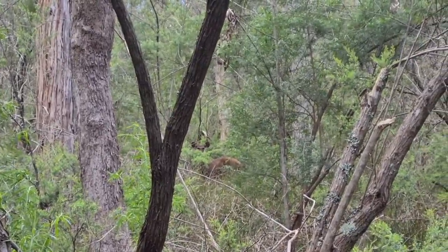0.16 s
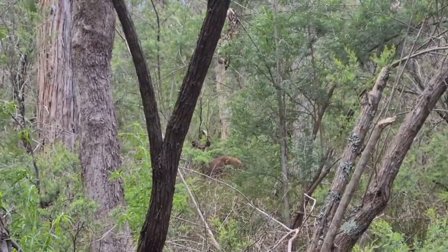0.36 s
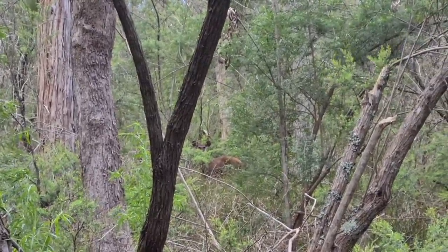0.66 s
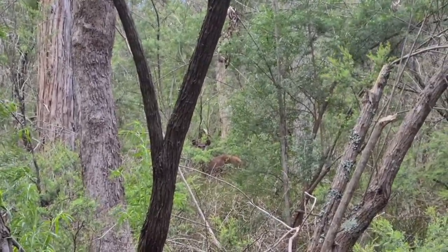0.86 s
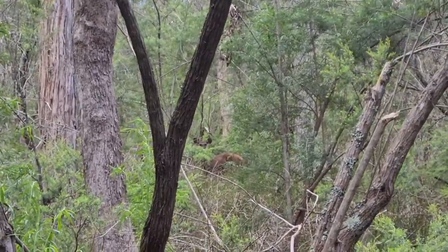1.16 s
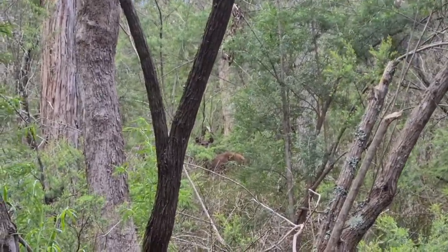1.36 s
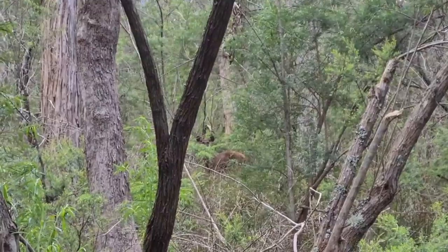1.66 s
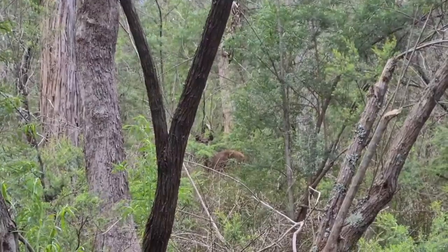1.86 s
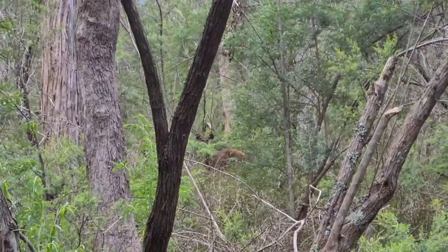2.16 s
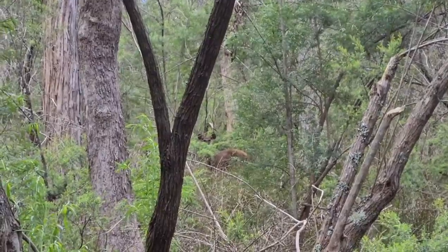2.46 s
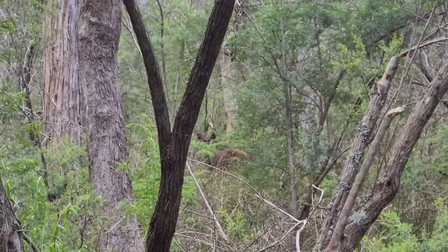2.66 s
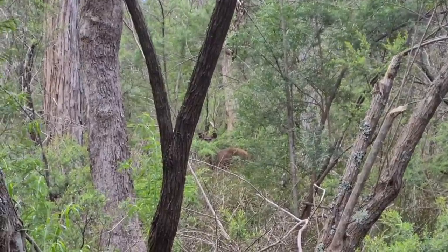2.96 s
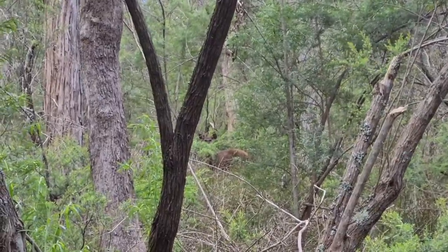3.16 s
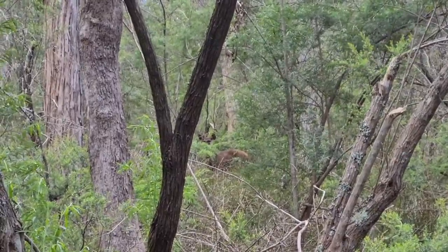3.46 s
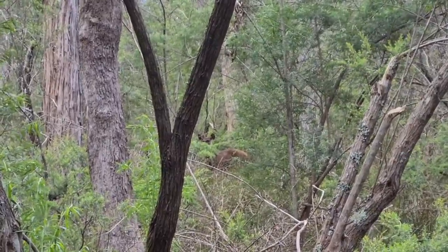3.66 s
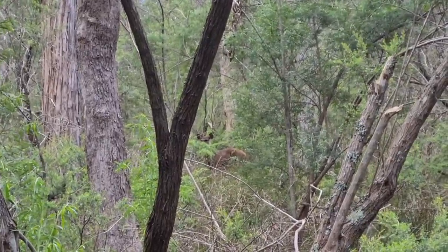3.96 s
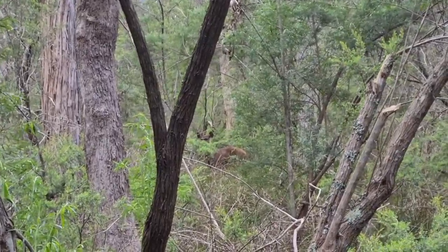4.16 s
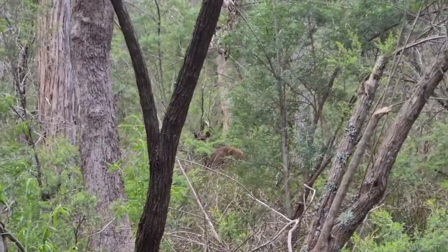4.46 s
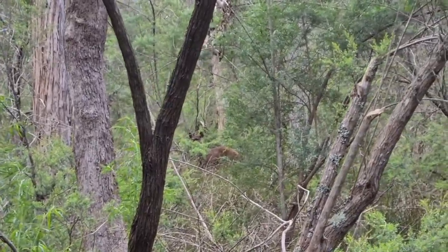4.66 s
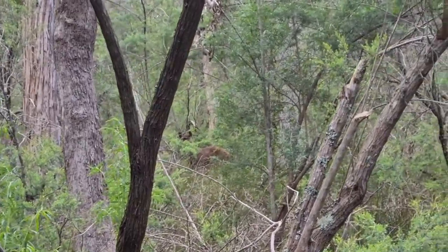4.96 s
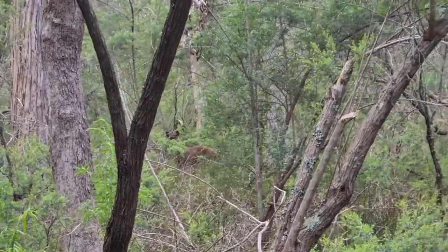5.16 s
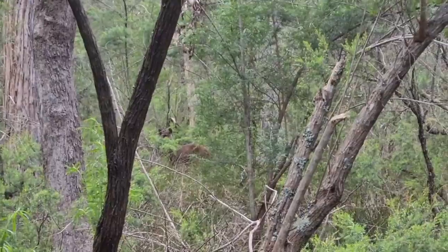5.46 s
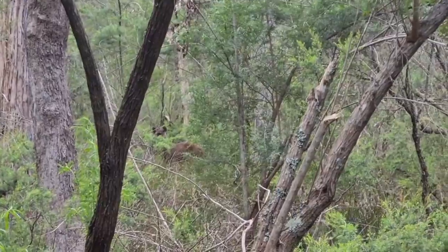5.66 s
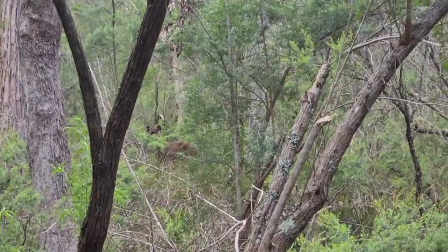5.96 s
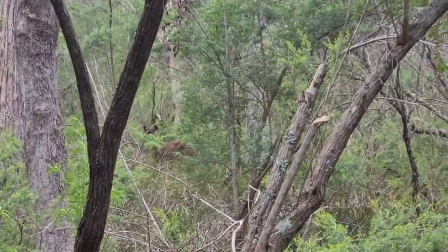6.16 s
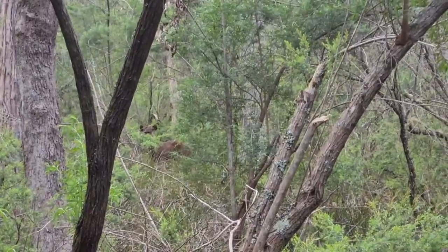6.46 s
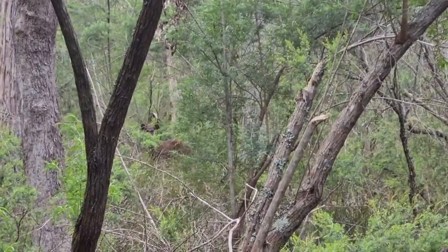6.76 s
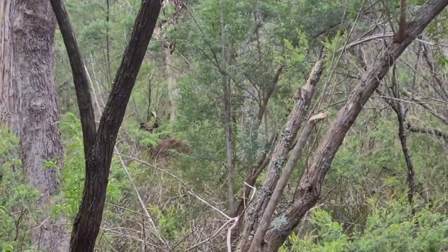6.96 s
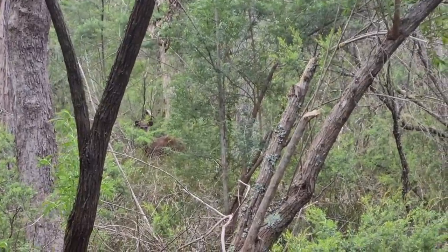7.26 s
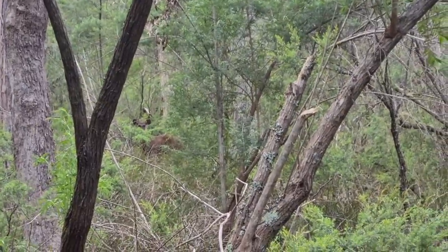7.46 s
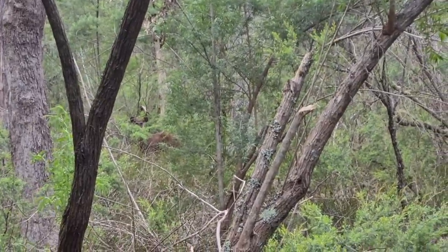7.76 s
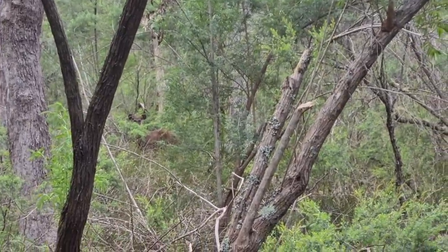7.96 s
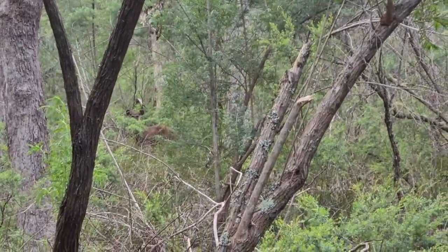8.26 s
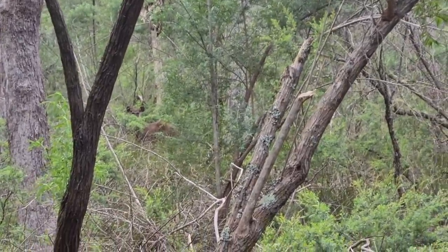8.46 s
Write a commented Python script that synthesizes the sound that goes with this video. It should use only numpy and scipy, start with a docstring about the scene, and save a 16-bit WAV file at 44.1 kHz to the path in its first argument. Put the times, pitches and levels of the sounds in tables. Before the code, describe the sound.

A soft breeze moves through quiet bushland while a distant bird chirps faintly. Close on the right, a mouth-blown reed caller gives one loud, deer-like bleat that rises, then sags into a rasp. A small bird tinkles on the left as the distant one chatters on and off. Two more bleats follow about a second apart, nearly dry, and the background dips after each call.

```python
"""Quiet bushland. Air moves through the trees throughout; a far bird opens with falling flicks.
At 1.1 s, close on the right, a mouth-blown reed caller gives a deer-like bleat: it snaps on, arches, rasps.
The trees answer softly; the camera's gain control ducks the air at each bleat and creeps back.
From 2.5 s the far bird chatters on and off, joined at 2.7-4.6 s by a small bird tinkling on the left.
Two more bleats follow at 6.3 and 7.4 s."""
import sys
import numpy as np
from scipy import signal
from scipy.fft import rfft, irfft, next_fast_len
from scipy.io import wavfile
from scipy.ndimage import uniform_filter1d, minimum_filter1d, map_coordinates

SR = 44100
rng = np.random.default_rng(int(sys.argv[2]) if len(sys.argv) > 2 else 0)


def persist_wave(psi):
    """Save psi, clipped to +-1, as 16-bit WAV."""
    counts = np.round(np.clip(psi, -1, 1) * 32767).astype(np.int16)
    wavfile.write(sys.argv[1], SR, np.atleast_2d(counts).T)


N = 380141

# Table levels are relative.
# rumble spectrum: freq_hz, density_db
RUMBLE_SPECTRUM = [(15, -21), (30, -8), (65, 0.5), (100, -2), (160, -14), (400, -38.5)]
# rumble swell: time_s, level_db
RUMBLE_SWELL = [(0, -67.5), (.9, -61), (1.3, -64.5), (2.6, -64.5), (4.3, -64), (5.3, -66.5), (6.9, -57.5),
                (7.75, -65.5), (8.6, -63.5)]
# canopy wash spectrum: freq_hz, density_db
WASH_SPECTRUM = [(70, -23), (160, -3.5), (280, -2), (550, -2.5), (800, -6.5), (1400, -22.5), (3000, -49.5)]
# leaf rustle spectrum: freq_hz, density_db
LEAF_SPECTRUM = [(400, -19), (850, 0), (1350, 3), (1950, -6), (2900, -4), (4200, -10.5), (6700, -14),
                 (7900, -24), (11500, -26), (15500, -27)]
# gusts in the leaves: centre_s, half_length_s, boost_db
GUSTS = [(0.125, .2, 3), (4.453, .22, 1.5), (5.55, .33, 3)]
# left-right likeness of the breeze: freq_hz, correlation
COHERENCE = [(50, 0.37), (100, 0.67), (190, 0.93), (500, 0.72), (1200, .5), (3000, .15), (8000, 0.046)]

# far bird, runs of flicks: first_s, last_s, spacing_s, top_hz, level_db
FLICK_RUNS = [(0.084, 0.663, .193, 3550, -64), (2.49, 3.227, .147, 4045, -57),
              (4.809, 5.064, .126, 4860, -62), (5.101, 5.698, .15, 3430, -55.5)]
# far bird, slurs onto a held pitch: start_s, length_s, pitch_hz, start_below_ratio, level_db
SLURS = [(5.058, 0.081, 3030, -0.58, -54), (5.25, 0.064, 2950, 0.062, -54.5),
         (5.374, 0.054, 3660, 0.045, -55), (5.662, 0.051, 3700, 0.094, -53.5),
         (5.869, 0.069, 2840, .3, -54.5), (5.919, .11, 3580, 0.082, -57),
         (6.014, 0.059, 2876, 0.086, -53.5)]
# decay of tree scatter: freq_hz, t60_s
TREE_DECAY = [(300, .3), (1200, .4), (3000, 0.51), (6000, 0.42), (12000, 0.17)]

# pitch curve per bleat: time_s, pitch_hz
BLEAT_PITCH = [
    [(1.078, 1312), (1.126, 1400), (1.18, 1581), (1.21, 1651), (1.228, 1665), (1.252, 1656), (1.288, 1545),
     (1.353, 1463), (1.413, 1428), (1.461, 1384), (1.497, 1306), (1.545, 1146), (1.599, 1047), (1.623, 937),
     (1.734, 593)],
    [(6.263, 1368), (6.281, 1416), (6.311, 1445), (6.359, 1605), (6.389, 1667), (6.413, 1656),
     (6.484, 1553), (6.526, 1442), (6.544, 1419), (6.592, 1398), (6.622, 1363), (6.682, 1253),
     (6.706, 1170), (6.754, 907), (6.844, 579)],
    [(7.364, 1590), (7.406, 1605), (7.448, 1679), (7.484, 1725), (7.532, 1722), (7.585, 1709),
     (7.633, 1639), (7.729, 1532), (7.783, 1503), (7.831, 1390), (7.867, 1335), (7.909, 1232),
     (7.969, 1107), (8.082, 784), (8.128, 584)],
]
# level curve per bleat, catch to release: time_s, level_db
BLEAT_LEVEL = [
    [(1.076, -11.5), (1.128, -9.5), (1.16, -13.5), (1.235, -15.5), (1.298, -12.5), (1.335, -15.5),
     (1.43, -12.5), (1.458, -10), (1.51, -14.5), (1.64, -17), (1.698, -26.5), (1.74, -50)],
    [(6.26, -12.5), (6.33, -12.5), (6.36, -13.5), (6.47, -13.5), (6.5, -11), (6.68, -24), (6.75, -21),
     (6.785, -21.5), (6.816, -27), (6.85, -46.5)],
    [(7.36, -17), (7.4, -14), (7.47, -15.5), (7.775, -11.5), (7.86, -20.5), (7.895, -24), (7.915, -20.5),
     (7.94, -24), (7.98, -24), (8.003, -19), (8.095, -28.5), (8.14, -58)],
]
# delivery per bleat: push_db, surge_s, surge_half_s, surge_twang_db, surge_buzz_db,
# hiss_db, lead_in_s, whistle_hz, ring_db
BLEAT_DELIVERY = [(7.5, 1.54, 0.083, 8.5, 13.5, -40.5, 0.086, 1100, -38),
                  (8, 6.405, .03, 3, 2.5, -42.5, 0.067, 1150, -36.5),
                  (9.5, 7.56, .06, 2, 8.5, -44.5, 0.1, 1380, -45.5)]
# resonance of the caller: freq_hz, gain_db
CALLER_RESONANCE = [(550, -22.5), (900, -19.5), (1150, -12), (1700, -9), (2300, -6.5), (2900, 3),
                    (3400, -1.5), (4100, -14.5), (5000, -12), (6100, -19.5), (6900, -17.5), (8200, -37.5),
                    (9900, -31.5), (11700, -24), (13500, -23.5), (15200, -20)]
# air hissing through the reed: freq_hz, density_db
HISS_SPECTRUM = [(100, -48.5), (400, -18.5), (800, -7.5), (1150, -8), (2000, -7), (2900, -1.5), (3500, -1),
                 (4300, -14.5), (5700, -5), (6900, 0), (8300, -17.5), (10500, -19.5), (12000, -6.5),
                 (13000, -7.5), (15300, -1)]
# sizzle riding on the buzz: freq_hz, density_db
SIZZLE_SPECTRUM = [(3500, -29), (5600, -12.5), (6900, -7.5), (8300, -20.5), (10500, -9), (12000, -2),
                   (13000, -6.5), (15200, 0)]
# hollow puff at release: freq_hz, density_db
PUFF_SPECTRUM = [(100, -49), (280, -2.5), (380, 0.5), (600, -10), (1000, -17.5), (2000, -36)]
# trunk and ground reflections: left_delay_ms, right_delay_ms, level_db
BOUNCES = [(1.05, 1.6, -24.5), (3.3, 4.1, -29), (7.6, 8.006, -28.5)]

# near bird, reedy arched notes: start_s, top_hz, level_db
ARCHES = [(2.72, 5860, -55), (3.072, 6110, -46.5), (3.291, 5520, -47), (3.425, 5820, -45.5),
          (3.791, 5950, -46), (4.017, 5650, -49), (4.168, 6020, -48.5), (4.251, 5700, -46.5)]
# near bird, clear dropping notes: start_s, length_s, pitch_hz, level_db
TINKLES = [(2.817, 0.027, 5110, -45), (2.862, 0.047, 5830, -42.5), (3.15, 0.025, 5765, -30.5),
           (3.186, 0.051, 6545, -34.5), (3.349, 0.028, 5220, -36.5), (3.378, .013, 5460, -37.5),
           (3.503, 0.026, 5900, -34.5), (3.62, 0.025, 5534, -34), (3.657, 0.017, 6780, -38),
           (3.71, 0.029, 5144, -37), (3.744, 0.013, 5550, -36.5), (3.87, 0.028, 6074, -33),
           (3.919, 0.047, 6610, -37), (4.078, 0.02, 4984, -31.5), (4.113, 0.022, 6540, -41),
           (4.303, 0.14, 6470, -38.5), (4.462, 0.11, 5064, -31)]

WASH_DB, LEAVES_DB = -56, -55.5  # between gusts
LEFT_LAG_MS = .51  # leaves and near bird
FLICK_S, FLICK_END_RATIO, FLICK_SCATTER_DB = 0.053, .56, 2.5
HELD_TONE_DB = -12.5  # reference for a bleat's level swings
TWANG_DB, TWANG_DB_PER_DB = -24, 0.39  # overtones at about 4-8 kHz
BUZZ_DB, BUZZ_DB_PER_DB = -33.5, .12  # overtones above 8 kHz
DULL_S, DULL_DB, RING_HZ = 0.11, 24.5, 1140  # end of the blow
DROP_RATIO, DROP_BASE_HZ = .35, 4400  # a tinkle drops by this share of its height above the base
ARCH_S, ARCH_START_RATIO, ARCH_END_RATIO = 0.0364, .88, .96
CEILING, HOLD_S, RECOVER_DB_PER_S, TOP_HZ = 0.94, 0.78, 4.5, 15900


def amp(db):
    """Decibels to gain."""
    return 10 ** (np.asarray(db) / 20)


def unit(x):
    """x at rms 1."""
    return x / np.sqrt(np.mean(x ** 2) + 1e-20)


def at_hz(rows, hz):
    """(freq_hz, value) rows read on a log axis."""
    freq_hz, values = np.transpose(rows)
    return np.interp(np.log(hz + 1), np.log(freq_hz + 1), values)


def at_time(rows, t):
    """(time_s, value) rows read at t."""
    return np.interp(t, *np.transpose(rows))


def wobble(rate_hz, size):
    """Smooth random curve with knots at rate_hz."""
    knots = rng.standard_normal(int(size * rate_hz / SR) + 4)
    return map_coordinates(knots, [np.arange(size) * rate_hz / SR])


def filtered(x, response):
    """x through a complex frequency response."""
    n = x.shape[-1]
    m = next_fast_len(n + 8192)
    return irfft(rfft(x, m) * response(np.fft.rfftfreq(m, 1 / SR)), m)[..., :n]


def delayed(x, ms):
    """x, later by ms."""
    return filtered(x, lambda hz: np.exp(-2j * np.pi * hz * ms / 1000))


def add(track, start_s, sound):
    """Mix a sound into a track."""
    part = track[round(start_s * SR):][:len(sound)]
    part += sound[:len(part)]


def placed(x, left_db, left_lead_ms):
    """Direct path to two microphones."""
    return np.array([amp(left_db) * delayed(x, -left_lead_ms), x])


def moving_air(spectrum, patchy_db):
    """Partly coherent stereo noise, rms 1, with patches of random gain."""
    bins = signal.stft(rng.standard_normal((2, N)), nperseg=512)[2]
    patches = uniform_filter1d(rng.standard_normal(bins.shape[1:]), size=6, axis=0)
    patches = unit(uniform_filter1d(patches, size=14, axis=1))
    pair = signal.istft(bins * amp(patchy_db * patches), nperseg=512)[1][:, :N]

    def mid_side(hz):
        width_rad = np.arccos(at_hz(COHERENCE, hz)) / 2
        return amp(at_hz(spectrum, hz)) * [np.cos(width_rad), np.sin(width_rad)]

    mid, side = filtered(pair, mid_side)
    return unit(np.array([mid + side, mid - side]))


def breeze():
    """Low rumble, canopy wash and a leaf rustle that swells in gusts."""
    t = np.arange(N) / SR
    gust_db = sum(db * np.exp(-((t - centre_s) / half_s) ** 2) for centre_s, half_s, db in GUSTS)
    rumble_db = at_time(RUMBLE_SWELL, t) + 4.5 + wobble(6.5, N)
    rumble = amp(rumble_db) * moving_air(RUMBLE_SPECTRUM, patchy_db=0.5) * amp([[1], [-1]])
    wash = amp(WASH_DB + .2 * gust_db) * moving_air(WASH_SPECTRUM, patchy_db=0.45)
    leaves = amp(LEAVES_DB + gust_db) * moving_air(LEAF_SPECTRUM, patchy_db=1.35) * amp([[-1.5], [1.2]])
    return rumble + wash + np.array([delayed(leaves[0], LEFT_LAG_MS), leaves[1]])


def bird_note(length_s, pitch_hz, waver, reed=0):
    """Wavering whistle; pitch_hz is a function of progress u, 0 to 1."""
    n = int(length_s * SR)
    u = np.linspace(0, 1, n)
    hz = pitch_hz(u) * (1 + waver * wobble(700, SR // 4)[:n])
    phase = 2 * np.pi * np.cumsum(hz) / SR
    # reedy note: harmonic 4 of a low voice, flanked by 3 and 5
    flanks = np.sin(phase * 3 / 4) + np.sin(phase * 5 / 4)
    swell = np.sin(np.pi * u ** 1.1) * amp(0.72 * wobble(80, SR // 4)[:n])
    return swell * (np.sin(phase) + reed * flanks)


def far_bird():
    """Runs of falling flicks and a few slurs, on the right, scattered by the trees."""
    song = np.zeros(N)
    for first_s, last_s, spacing_s, top_hz, db in FLICK_RUNS:
        fall_hz = lambda u: top_hz * (1 - (1 - FLICK_END_RATIO) * u ** 1.6)
        for start_s in np.linspace(first_s, last_s, round((last_s - first_s) / spacing_s) + 1):
            flick = bird_note(FLICK_S, fall_hz, waver=.05)
            add(song, start_s, amp(db + FLICK_SCATTER_DB * rng.standard_normal()) * flick)
    for start_s, length_s, hz, below, db in SLURS:
        bend_hz = lambda u: hz * (1 - below * (1 - u) ** 1.8)
        add(song, start_s, amp(db) * bird_note(length_s, bend_hz, waver=0.025, reed=0.092))
    direct = amp(9.5) * placed(song, left_db=-11.5, left_lead_ms=0.075)
    return direct + amp([[-2], [2]]) * tree_scatter(song)


def tree_scatter(x):
    """Diffuse tail from trunks and leaves, independent at each microphone."""
    hz, t, bins = signal.stft(rng.standard_normal((2, SR * 3 // 4)), SR, nperseg=256)
    decay = amp(-60 * t / at_hz(TREE_DECAY, hz)[:, None])
    build_up = 1 - np.exp(-t / 0.025)
    tail = signal.istft(bins * decay * build_up, SR, nperseg=256)[1]
    return signal.fftconvolve(x[None], tail / np.linalg.norm(tail[0]), axes=1)[:, :N]


def reed_voice(pitch_hz, phase, slack, body_db, twang_db, buzz_db):
    """Reed harmonics shaped by the caller's resonance, in three bands with separate levels."""
    k = np.arange(1, 25)[:, None]
    hz = k * pitch_hz
    shimmer_db = np.array([wobble(28, len(phase)) for _ in k]) * (np.minimum(0.5 * k, 4) + 0.4 * slack)
    emphasis_db = (k == 2) * 7 + (k == 4) * 4 * slack
    in_band = np.clip((TOP_HZ - hz) / 500, 0, 1)
    gain = amp(at_hz(CALLER_RESONANCE, hz) + emphasis_db + shimmer_db) * in_band
    partials = gain * np.sin(k * phase)
    body = np.clip((4200 - hz) / 600, 0, 1)
    buzz = np.clip((hz - 8000) / 1000, 0, 1)
    voice = np.zeros(len(phase))
    for band, db in [(body, body_db), (1 - body - buzz, twang_db), (buzz, buzz_db)]:
        band_rms = np.sqrt(np.sum((band * gain) ** 2, 0) / 2 + 1e-12)
        voice += amp(db) * np.sum(band * partials, 0) / band_rms
    return voice


def breath(spectrum, n):
    """Airflow noise, rms 1."""
    return unit(filtered(rng.standard_normal(n), lambda hz: amp(at_hz(spectrum, hz))))


def bleat(pitch_rows, level_rows, surge_s, surge_half_s, surge_twang_db, surge_buzz_db,
          hiss_db, lead_in_s, whistle_hz, ring_db):
    """One blow as (start_s, sound): a clean reed tone that turns raspy as its pitch sags."""
    on_s, off_s = level_rows[0][0], level_rows[-1][0]
    t = np.arange(on_s - .25, off_s + .15, 1 / SR)
    n = len(t)
    glide_hz = uniform_filter1d(at_time(pitch_rows, t), size=SR // 50)
    slack = np.clip((1380 - glide_hz) / 400, 0, 1)  # 0 steady, 1 loose vibration
    scoop = 1 - 0.083 * np.exp(-np.maximum(t - on_s + 0.0033, 0) / 0.0017)
    drift = .0008 * wobble(40, n) + .002 * slack * wobble(110, n)
    jitter = (0.0014 + 0.0085 * slack) * wobble(520, n)
    pitch_hz = glide_hz * scoop * (1 + drift + jitter)
    phase = 2 * np.pi * np.cumsum(pitch_hz) / SR

    # upper overtones surge once, then dull as the blow ends
    level_db = at_time(level_rows, t)
    swing_db = level_db - HELD_TONE_DB
    surge = np.exp(-((t - surge_s) / surge_half_s) ** 4)
    dulling_db = DULL_DB * np.clip((t - off_s) / DULL_S + 1, 0, 2) ** 2
    twang_db = TWANG_DB + TWANG_DB_PER_DB * swing_db + surge_twang_db * surge - 1.5 * dulling_db
    buzz_db = BUZZ_DB + BUZZ_DB_PER_DB * swing_db + surge_buzz_db * surge - dulling_db
    voice = reed_voice(pitch_hz, phase, slack, level_db + 4, twang_db, buzz_db)
    before_s, after_s = np.maximum(on_s - t, 0), np.maximum(t - on_s, 0)
    flutter = amp(0.31 * slack * wobble(90, n))
    gate = flutter * np.exp(-before_s / 0.0016 - np.maximum(t - off_s + .008, 0) / 0.0069)

    # air flows before the reed catches, then escapes in one pulse a cycle
    fade_db = 95 * before_s + 390 * np.maximum(before_s - lead_in_s, 0) + 120 * after_s
    lead_in = amp(hiss_db - fade_db + 2 * wobble(60, n))
    pulses = (1 + np.cos(phase)) * gate
    rasp = amp(level_db - 34 + 21 * slack) * pulses
    sizzle = amp(buzz_db - 19 + 7 * slack) * pulses * breath(SIZZLE_SPECTRUM, n)
    release = amp(-190 * np.abs(t - off_s + 0.017))
    puff = release * (amp(-50.5) * breath(PUFF_SPECTRUM, n) + amp(-49) * breath(HISS_SPECTRUM, n))

    # the caller whistles at the catch and rings after the release
    whistle = amp(hiss_db + 10.5 - 990 * np.abs(t - on_s)) * np.sin(2 * np.pi * whistle_hz * t)
    ring_phase = 2 * np.pi * RING_HZ * t + .5 * wobble(60, n)
    ring = amp(ring_db - 880 * np.abs(t - off_s - .006)) * np.sin(ring_phase)
    hiss = (lead_in + rasp) * breath(HISS_SPECTRUM, n)
    return t[0], gate * voice + hiss + sizzle + puff + whistle + ring


def reed_bleats():
    """Three nearly dry blows of the caller, on the right; reflections ripple the gliding overtones."""
    calls = np.zeros(N)
    for pitch_rows, level_rows, (push_db, *delivery) in zip(BLEAT_PITCH, BLEAT_LEVEL, BLEAT_DELIVERY):
        start_s, call = bleat(pitch_rows, level_rows, *delivery)
        add(calls, start_s, amp(push_db) * call)
    bright = filtered(calls, lambda hz: hz / (hz + 3000))  # small surfaces return mostly treble
    bounces = sum(amp(db + 7.5) * np.array([delayed(bright, left_ms), delayed(bright, right_ms)])
                  for left_ms, right_ms, db in BOUNCES)
    return placed(calls, left_db=-10.5, left_lead_ms=0.087) + bounces + amp(-44.5) * tree_scatter(calls)


def near_bird():
    """Quick phrase, louder on the left: clear dropping notes mixed with reedy arches."""
    song = np.zeros(N)
    for start_s, length_s, hz, db in TINKLES:
        drop_hz = lambda u: hz + DROP_RATIO * (hz - DROP_BASE_HZ) * (1 - u) ** 4.1
        add(song, start_s, amp(db) * bird_note(length_s, drop_hz, waver=0.0024))
    arch = np.poly1d(np.polyfit([0, .5, 1], [ARCH_START_RATIO, 1, ARCH_END_RATIO], 2))
    for start_s, top_hz, db in ARCHES:
        add(song, start_s, amp(db) * bird_note(ARCH_S, lambda u: top_hz * arch(u), waver=.003, reed=0.17))
    return placed(song, left_db=5.5, left_lead_ms=-LEFT_LAG_MS) + amp(-6.5) * tree_scatter(song)


def scene():
    """Stereo sum, near to far."""
    return reed_bleats() + near_bird() + far_bird() + breeze()


def record(dry):
    """Camera gain control: instant cut at each bleat, hold, slow recovery; then the band limit."""
    peak = np.abs(dry).max(axis=0) + 1e-9
    needed_db = 20 * np.log10(np.minimum(CEILING / peak, 1))
    half_hold = int(HOLD_S * SR) // 2
    held_db = minimum_filter1d(needed_db, size=2 * half_hold + 1, origin=half_hold, mode="nearest")
    recovery_db = RECOVER_DB_PER_S * np.arange(N) / SR
    gain_db = np.minimum.accumulate(held_db - recovery_db) + recovery_db
    gain_db = uniform_filter1d(minimum_filter1d(gain_db, size=SR // 400), size=SR // 400)
    return filtered(dry * amp(gain_db), lambda hz: hz < TOP_HZ)


dry = scene()
out = record(dry)
persist_wave(out)
```